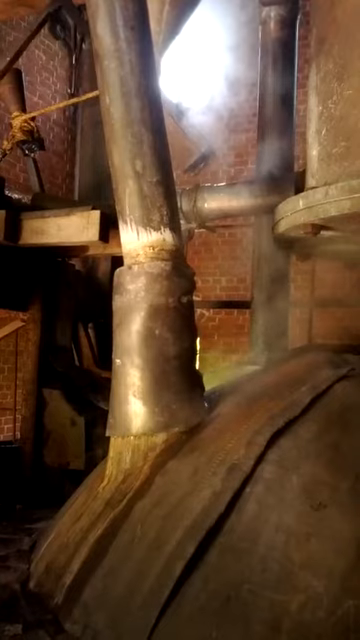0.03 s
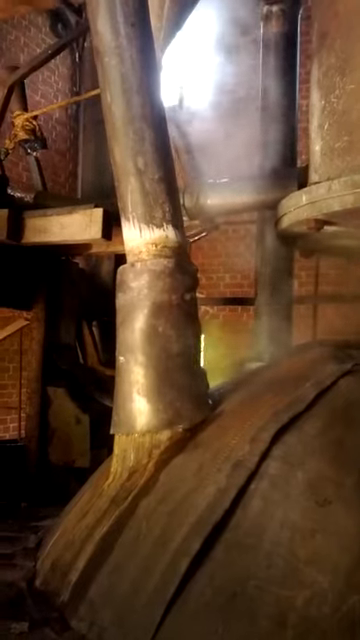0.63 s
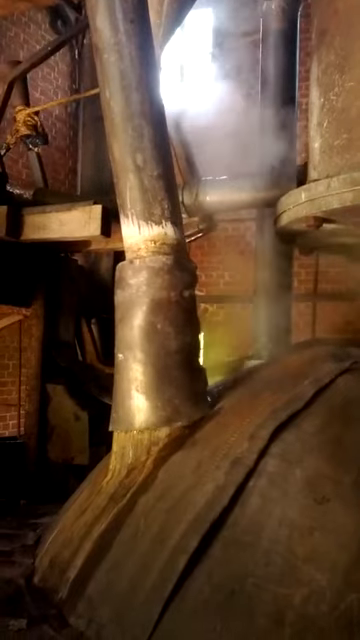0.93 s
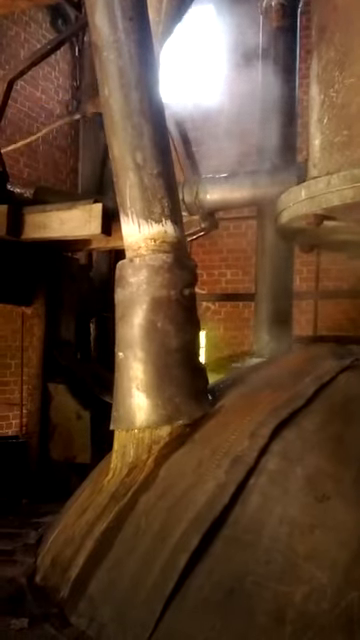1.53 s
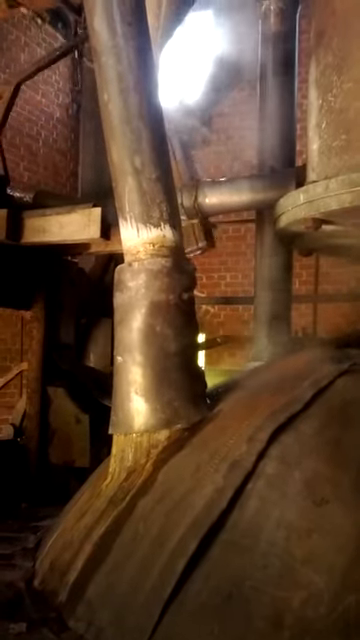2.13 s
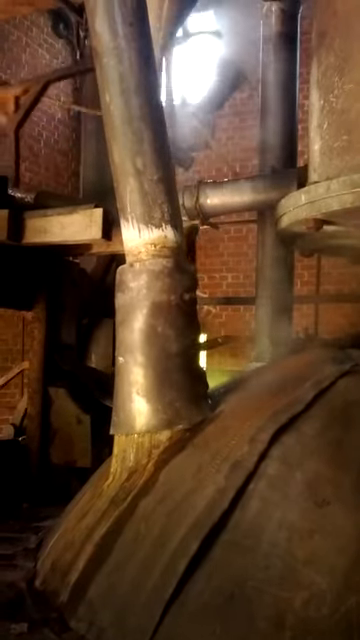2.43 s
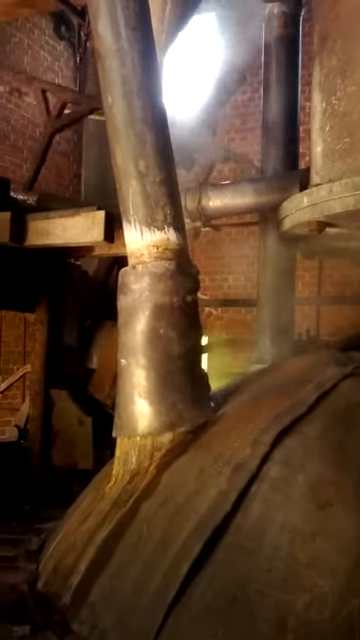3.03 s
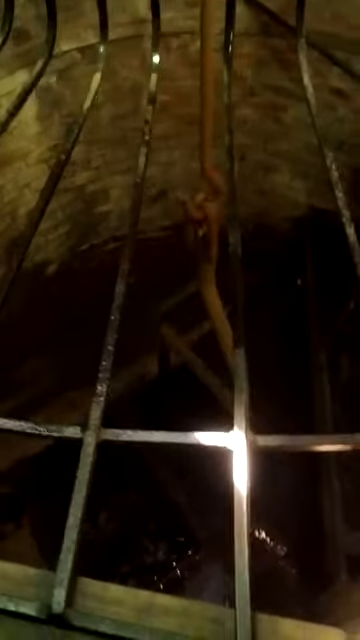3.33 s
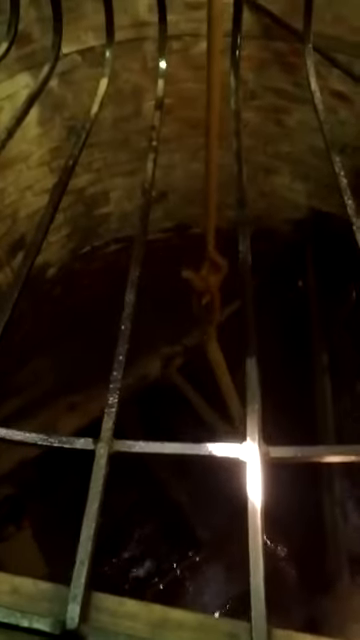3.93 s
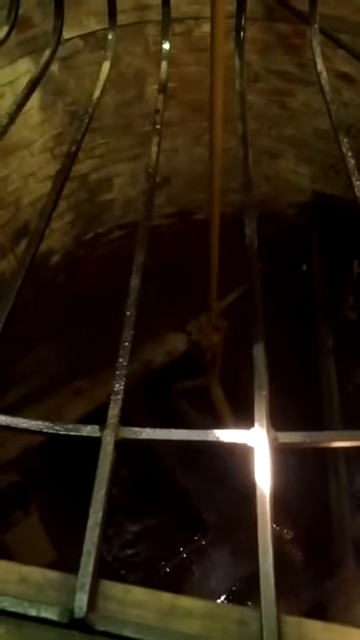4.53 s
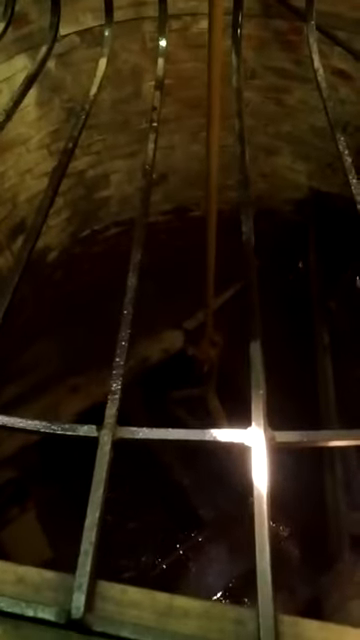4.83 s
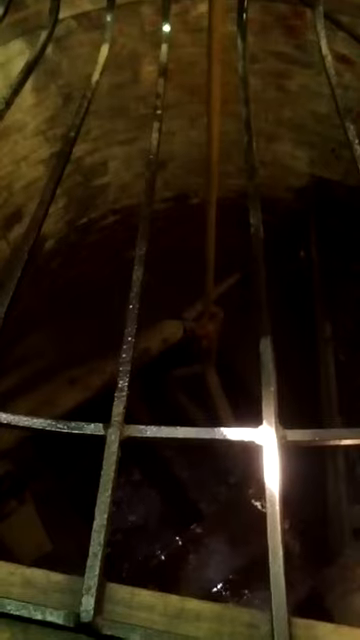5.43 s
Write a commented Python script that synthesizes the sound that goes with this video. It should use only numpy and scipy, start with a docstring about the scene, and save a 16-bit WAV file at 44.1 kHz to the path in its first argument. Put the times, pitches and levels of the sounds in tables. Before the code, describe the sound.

Uneven metal knocks and sharp ringing clanks come from the nearby ironwork of a steam engine, over a growing hiss, the hardest blows slightly distorted. Brief pivot squeaks slip between them and brick walls echo. An abrupt cut moves the microphone beneath the engine, where lighter clinks sound over hissing water and steam and a low pipe hum, followed by one heavy, booming double knock. The sound is nearly mono.

```python
"""Iron levers and catches clank over simmering steam, close beside the valve gear of an old beam engine.
Struck iron pings and rebounds, a few pivots squeak, and the brick engine house rings on after every blow.
After a short silence we listen from below: water and steam hiss, a pipe hums and the beam thuds.
The sound is nearly mono, and the loudest blows clip."""
import sys
import numpy as np
from scipy import signal
from scipy.fft import rfft, irfft, next_fast_len
from scipy.io import wavfile
from scipy.ndimage import uniform_filter1d

SR = 44100
rng = np.random.default_rng(int(sys.argv[2]) if len(sys.argv) > 2 else 0)


def dump(signal):
    """Clip the signal to [-1, 1] and save it as 16-bit WAV at the path in sys.argv[1]."""
    limited = np.clip(np.atleast_2d(signal).T, -1, 1)
    pcm = np.round(limited * 32767).astype(np.int16)
    wavfile.write(sys.argv[1], SR, pcm)


N = 250047
TIME = np.arange(N) / SR


def gear(start, end):
    """The engine's ironwork between two times [s]: its blows and its short falling tones."""
    # (time [s], part, level [dB], brightness [dB/octave], clear modes against the crash [dB])
    blows = [ (0.288, "lever", -4.5, 4.5, -15), (0.302, "lever", 0, 1, -1.5),
             (0.563, "lever", -4, 2.5, -18), (0.708, "lever", -15, -1, -13), (0.965, "chain", -25, 2, -9.5),
             (1.034, "link", -25, -1.5, -11), (1.099, "catch", -22, -0.5, -11),
             (1.324, "weight", -11.5, -2, -11), (1.356, "catch", -10.5, 0, -2),
             (1.377, "catch", -9, 2.5, -3.5), (1.651, "valve", -18.5, -1, -24),
             (1.703, "catch", -11, 1.5, -7), (1.842, "catch", -7, 1, -16), (1.868, "catch", -5, 1, -11),
             (1.920, "lever", -13, 1.5, -13), (1.965, "weight", -12, -1, -16), (1.991, "weight", 3, 0, -8),
             (2.143, "lever", -15, -.5, -22), (2.274, "catch", -15.5, 4, -6), (2.461, "link", -25, 2.5, -2),
             (2.602, "valve", -.5, 1, -0.5), (2.658, "piston", -6.5, 1.8, -7), (2.885, "rod", -5, 2.1, -8),
             (2.914, "rod", -8, 4.5, -9), (3.139, "valve", -16.5, 1, -22), (3.211, "rod", -15.5, 5, -10),
             (3.263, "rod", -15.5, 3.5, -16), (3.433, "link", -16.5, 0.5, -6),
             (3.636, "link", -25.5, 0, -5.5), (3.784, "link", -24, -.5, -15),
             (3.835, "link", -21.5, -0.5, -13), (4.862, "chain", -18.5, 0, -10),
             (4.882, "chain", -19.5, 0, -18), (5.109, "stop", -10, -1, 3), (5.139, "beam", -3.5, 0.1, -3), ]
    # chirps and pings of struck iron, a few pivot squeaks:
    # (time [s], length [s], first pitch [Hz], level [dB])
    chirps = [ (0.287, 0.018, 720, -15), (0.299, .033, 4120, -6), (1.322, 0.0095, 2260, -15.5),
              (1.332, .012, 950, -15), (1.823, 0.034, 9700, -19), (2.059, 0.021, 2020, -9.5),
              (2.642, 0.011, 1280, -4.5), (3.135, 0.026, 4700, -25), (3.209, .016, 1640, -27),
              (3.263, 0.018, 1780, -18), (3.280, 0.02, 1478, -20), (3.850, 0.033, 3550, -29),
              (4.810, 0.028, 3830, -34), ]
    track = np.zeros(N)
    for start_s, part, db, tilt_db, modes_db in blows:
        if start <= start_s < end:
            add(track, start_s, strike(part, db, tilt_db, modes_db))
    for start_s, length_s, hz, db in chirps:
        if start <= start_s < end:
            add(track, start_s, amp(db) * chirp(length_s, hz))
    return track


def strike(part, db, tilt_db, modes_db):
    """One blow on a part, crashing longer the heavier it is, and its rebounds."""
    # how each part makes contact: (crash t60 of a 0 dB blow [s], rise [s], step per rebound [dB])
    contact_of = { "lever": (0.28, 0.0017, -9.5), "catch": (0.23, 0.0015, -13.5),
                  "weight": (.26, 0.0013, -21), "valve": (0.31, 0.0013, -24), "rod": (.15, 0.00089, -22),
                  "link": (.66, 0.0023, -19), "chain": (0.98, 0.0048, -12), "piston": (0.45, 0.00088, -23),
                  "stop": (0.51, 0.0011, -20), "beam": (0.5, 0.0073, -15.5), }
    t60, rise_s, rebound_db = contact_of[part]
    crash_t60 = t60 * 2 ** (db / 24)  # twice as long for 24 dB more
    blow = iron_blow(part, tilt_db, crash_t60, rise_s, modes_db)
    return amp(db) * rebounds(blow, rebound_db)


def iron_blow(part, tilt_db, crash_t60, rise_s, modes_db, ring_scale=0.54, size=32768):
    """Iron meets iron: a crash of crowded modes dies away while a few clear ones ring."""
    # each part's crowded modes, as a spectrum: (frequency [Hz], relative density [dB])
    body_of = { "lever": [(29, -44), (50, -13), (118, -1), (284, -6), (521, 0), (1370, -10.5), (1650, -1.5),
               (2160, -6.5), (2640, -9.5), (3880, -7.5), (4440, -10), (6970, -13), (10900, -14.5),
               (14200, -71), (22000, -120)], "catch": [(29, -56.5), (50, -12), (118, 4.5), (332, -1.5),
               (398, 7.5), (455, -1), (668, -0.5), (5820, -5.5), (7290, -10), (7800, -8), (10000, -6.5),
               (10900, -5), (14200, -64), (22000, -120)], "weight": [(29, -46), (50, -20), (115, -17),
               (683, -14), (819, -9), (1260, -11.5), (1930, -9.5), (2210, -15), (2470, -7.5), (2640, -9),
               (3710, -9.5), (10900, -9.5), (14200, -47), (22000, -120)], "valve": [(59, -37), (100, 5),
               (331, -8.5), (659, 1), (2410, -10.5), (2930, -5), (4020, -8.5), (4350, -6.5), (5290, -7.5),
               (9530, -7), (10900, -9), (14200, -45), (22000, -120)], "rod": [(290, -44), (500, -36),
               (894, -9), (991, -10), (1170, -12.5), (1390, -6.5), (1790, -13), (1940, -10.5), (2510, -26),
               (3210, -27.5), (4910, -33.5), (8780, -22), (10900, -34.5), (14200, -60), (22000, -120)],
               "link": [(240, -38), (400, -9), (472, -11), (499, -18), (944, -15), (1130, -5), (1780, -13),
               (2080, -10), (4270, -7.5), (10900, -18), (14200, -56), (22000, -120)], "chain": [(88, -41),
               (150, -13), (221, -6), (261, -34), (300, -2), (548, -14.5), (782, 1.5), (899, -11),
               (1150, -9.5), (1910, -18), (2530, -26), (3610, -22), (6000, -49), (7800, -58),
               (13200, -120)], "piston": [(16, -43), (28, -18), (48, 6), (98, -0.5), (324, -7), (684, -1.5),
               (878, -10.5), (1770, -18), (2910, -25.5), (4240, -29), (6640, -27), (10900, -29),
               (14200, -54), (22000, -120)], "stop": [(29, -41), (50, -13), (340, -5.5), (466, -8.5),
               (715, -12), (1610, -17.5), (2700, -28), (3790, -24.5), (10900, -24), (14200, -59),
               (22000, -120)], "beam": [(20, -28), (42, -3), (62, -21), (95, 3), (140, -6.5), (215, 0),
               (300, -7), (520, -6.5), (670, -3.5), (950, -9.5), (1400, -10), (2000, -17.5), (4000, -19),
               (11000, -25.5)], }
    # each part's clear modes: (frequency [Hz], relative level [dB], t60 before ring_scale [s])
    modes_of = { "lever": [(518, -5.5, 0.23), (1630, -28, 0.62), (2080, -7, 0.92), (2369, -12, 0.64),
                (2600, -34, 0.58), (3040, 3, 0.14), (3880, -20, 0.48), (3881, -7, 0.38), (4000, -30, 1.2),
                (4420, -9, 0.49), (4753, -12, 0.29), (5660, -4.5, 0.16), (6417, -7, 0.2), (6200, -3, 0.23),
                (7100, -2, 0.42), (7550, -17, 0.58), (9000, -18, 0.43), (9400, -1, 0.27), (9469, -23, 0.42),
                (9900, -23, 0.42)], "catch": [(1960, -19, 0.54), (3550, -14, .5), (5450, -4, .3),
                (5720, -4, 0.52), (6400, -2, .25), (6681, -14, 0.37), (7720, 2, 0.28), (7870, 5, 0.37),
                (8650, -17, 0.33), (10100, -11, .2), (9800, -3, 0.12), (10830, 5.5, 0.15)],
                "weight": [(1906, -12, 0.45), (2440, -5, 0.46), (2750, -18, 0.5), (3780, -4, 0.5),
                (4180, -18, .6), (4667, -16, .25), (5840, -13, .4), (6928, -12, .35), (7280, -4, .3),
                (8800, -7, .3), (9850, 1, .18), (10400, -10, .25), (11440, 3, .24), (10900, 0, .3)],
                "valve": [(2930, -7, 0.49), (3740, -17, 0.71), (4450, -10, 0.44), (4484, 1, 0.32),
                (6380, -11, 0.3), (6460, -4, 0.4), (6630, 5.5, 0.19), (10200, -6, 0.34), (9240, 5.5, 0.12),
                (9550, 3, 0.15), (11500, -19, 0.59)], "rod": [(1027, -1, 0.6), (1400, 6.5, 0.23),
                (2000, -8, 0.53), (2420, -12, 0.83), (7052, -15, 0.37), (7585, -20, 0.44), (7800, 5, 0.065),
                (9000, -24, 1)], "link": [(1118, 0.5, 0.51), (2160, 3, .3), (2568, -13, 0.25),
                (3655, -8, 0.13), (4300, 5, 0.21), (6900, -12, 0.21), (7160, -14, .25)],
                "chain": [(334, -25, 0.42), (725, 3, 1), (810, -1, 3.2), (820, 4, 1), (1177, 17, 1.1),
                (1570, -2, 0.57), (1870, 11, 0.79)], "piston": [(98.2, 0.5, 0.81), (381, -5.5, 0.89),
                (466, -26, 0.91), (540, -10, .7), (693, -4, 0.89), (702, -2, 0.51), (771, 0, 0.48)],
                "stop": [(93.4, -4, 0.79), (207, -10, 0.44), (299, -0.5, 0.28), (344, 6.5, 0.21)],
                "beam": [(41.8, -4, 1), (91.4, -7, 0.7), (155, -8, 0.65), (213, -6, .45),
                (266.5, 5.5, 0.36), (294.4, 5.5, 0.21), (451, -13, 1), (693, -2.5, .8), (824, -8, 1),
                (1010, -13, 0.96), (1230, -5, 0.4), (1406, -11, 0.9)], }
    t = np.arange(size) / SR

    def hardness_db(hz):
        """A harder contact tilts the whole spectrum upwards."""
        return tilt_db * np.log2(np.maximum(hz, 200) / 1000)

    def crash_gain(hz):
        """A short, clean contact bunches the upper modes into brief partials; a long one smears them."""
        bunching_db = 4 * ripple(hz, spacing_hz=70) * np.minimum(hz / 1500, 1) * min(.15 / crash_t60, 1)
        return amp(at(body_of[part], hz) + hardness_db(hz) + bunching_db)

    crash = noise(size, crash_gain) * fade(t, crash_t60)
    mode_hz, mode_db, decays = np.transpose(modes_of[part])
    # each blow lands on a slightly different spot and stirs the clear modes in a new balance
    scatter_db = 1.5 * rng.standard_normal(len(mode_hz))
    gains = amp(mode_db + hardness_db(mode_hz) + scatter_db)
    gains /= np.sqrt(np.sum(gains ** 2) / 2)
    phases = rng.uniform(0, 2 * np.pi, len(mode_hz))
    ring = sum(gain * np.sin(2 * np.pi * hz * t + phase) * fade(t, ring_scale * decay)
               for hz, gain, decay, phase in zip(mode_hz, gains, decays, phases))
    chatter = amp(2 * walk(rate_hz=122)[:size])  # loose joints roughen the ring
    attack = 1 - np.exp(-t / rise_s)
    return (crash + amp(modes_db) * ring * chatter) * attack


def rebounds(sound, rebound_db, first_gap_s=.074, gap_shrink=.9, dull_hz=6000):
    """Loose iron lands and bounces three times, each sooner, weaker and duller than the last."""
    soften = signal.butter(1, dull_hz, fs=SR, output="sos")
    track = np.pad(sound, (0, SR // 2))
    start_s = 0
    for bounce in range(3):
        start_s += first_gap_s * gap_shrink ** bounce
        sound = amp(rebound_db) * signal.sosfilt(soften, sound)
        add(track, start_s, sound)
    return track


def chirp(length_s, first_hz, fall_hz_per_s=8100, waver_hz=75, overtone_db=-12):
    """A short, unsteady falling tone: a chirp or ping of struck iron, or a pivot's squeak."""
    size = int(length_s * SR)
    glide_hz = np.linspace(first_hz, first_hz - fall_hz_per_s * length_s, size)
    wobble = unit(uniform_filter1d(rng.standard_normal(SR), size=30))[:size]
    phase = 2 * np.pi * np.cumsum(glide_hz + waver_hz * wobble) / SR
    tone = sum(amp(overtone_db * k) * np.sin((k + 1) * phase)
               for k in range(3) if (k + 1) * first_hz < SR / 2)
    return unit(tone) * signal.windows.tukey(size, .6)


def simmer(valve_opens_s=1.47, swell_db_per_s=3.5, full_swell_db=5.5):
    """Steam close by at the valve gear: the valve is thrown open and the flow swells to full strength."""
    # simmering steam: (frequency [Hz], relative density [dB])
    spectrum = [(15, -34), (25, -3), (48, -3), (99, -1), (145, -4), (380, -8), (478, -0.5), (602, -7.5),
                (756, -2.5), (881, -6), (1030, -4), (2910, -19.5), (10900, -21.5), (14200, -76),
                (22000, -120)]
    swell_db = np.clip(swell_db_per_s * (TIME - valve_opens_s), 0, full_swell_db)
    return amp(-29.5 + swell_db) * steam(spectrum, flicker_db=2.5)


def spray():
    """Water and steam hiss steadily below the engine."""
    # escaping water and steam: (frequency [Hz], relative density [dB])
    spectrum = [(15, -41), (25, -9), (48, -15.5), (66, -10.5), (101, -14.5), (118, -12.5), (196, -12.5),
                (229, -16.5), (310, -10.5), (400, -14), (649, -12.5), (1110, -14), (2090, -17),
                (10900, -21), (14200, -127), (22000, -120)]
    return amp(-27.5) * steam(spectrum, flicker_db=0)


def steam(spectrum, flicker_db):
    """Escaping steam of rms 1: each band of the hiss flickers on its own by about flicker_db."""
    hiss = noise(next_fast_len(N), lambda hz: amp(at(spectrum, hz)))
    return unit(sum(band[:N] * amp(flicker_db * walk(rate_hz=18)) for _, band in split(hiss)))


def pipe_hum(pipe_hz=200, half_width_hz=7.3):
    """The flow keeps one pipe resonance humming unsteadily."""
    hum = noise(next_fast_len(N), lambda hz: 1 / (1 + ((hz - pipe_hz) / half_width_hz) ** 2))
    return amp(-37.5) * hum[:N]


def engine_house(sound, low_cut_hz, echo_db, build_s=0.011, size=65536):
    """Direct sound, thin below low_cut_hz, and a brick echo that builds up and holds the lows longest."""
    # the brick walls' echo: (frequency [Hz], relative energy [dB], t60 [s])
    walls = [(50, 4, 1.64), (198, 2.5, 1.03), (690, 0, 1.34), (2000, -1.5, 0.7), (4370, -4, 0.56),
             (10100, -12, 0.47)]
    t = np.arange(size) / SR
    tail = np.zeros(size)
    for hz, band in split(rng.standard_normal(size)):
        envelope = fade(t, at(walls, hz, column=2)) * (1 - np.exp(-t / build_s))
        tail += amp(at(walls, hz)) * band * envelope / np.linalg.norm(envelope)
    direct = signal.sosfilt(signal.butter(1, low_cut_hz, "high", fs=SR, output="sos"), sound)
    return direct + amp(echo_db) * signal.fftconvolve(sound, tail)[:N]


def stereo_width(mid, size=512):
    """Nearly mono sound, with slight stereo width in the treble."""
    # how far left and right differ: (frequency [Hz], side against mid [dB])
    side_levels = [(800, -72), (1300, -60), (1600, -45), (2500, -11.5), (4000, -32.5), (6000, -34),
                   (8000, -8), (11000, -30)]
    hz = np.fft.rfftfreq(size, 1 / SR)
    random_phase = np.exp(2j * np.pi * rng.random(len(hz)))
    side_filter = irfft(amp(at(side_levels, hz)) * random_phase) * signal.windows.tukey(size, .5)
    side = signal.fftconvolve(mid, side_filter)[:N]
    return np.array([mid + side, mid - side])


def amp(db):
    return 10 ** (np.asarray(db) / 20)


def unit(x):
    return x / np.sqrt(np.mean(x ** 2))


def fade(t, t60):
    return np.exp(-np.log(1000) * t / t60)


def at(points, hz, column=1):
    """Read a column of a table on a log-frequency axis."""
    table = np.array(points, float)
    return np.interp(np.log(np.maximum(hz, 1)), np.log(table[:, 0]), table[:, column])


def noise(size, gain):
    """Noise of rms 1 whose spectrum follows gain(Hz)."""
    white = rfft(rng.standard_normal(size))
    return unit(irfft(white * gain(np.fft.rfftfreq(size, 1 / SR)), size))


def split(x, count=14):
    """Overlapping bands that add up to x: (centre [Hz], band)."""
    centres = np.geomspace(35, 12000, count)
    hz, spectrum = np.fft.rfftfreq(len(x), 1 / SR), rfft(x)
    return [(centre, irfft(spectrum * at(np.c_[centres, weights], hz), len(x)))
            for centre, weights in zip(centres, np.eye(count))]


def walk(rate_hz):
    """Random levels, drawn rate_hz times a second and smoothed twice; rms 1."""
    hold = int(SR / rate_hz)
    steps = np.repeat(rng.standard_normal(N // hold + 1), hold)
    return unit(uniform_filter1d(uniform_filter1d(steps, hold), hold)[:N])


def ripple(hz, spacing_hz):
    """Random peaks and dips along the frequency axis; spread near 1."""
    knots = np.arange(0, SR / 2, spacing_hz)
    return np.interp(hz, knots, rng.standard_normal(len(knots)))


def add(track, start_s, sound):
    """Mix a sound into the track."""
    start = int(start_s * SR)
    track[start:start + len(sound)] += sound[:N - start]


def scene():
    """The microphone stands beside the valve gear, then below it, nearer to the heavy parts."""
    pause_start_s, pause_end_s, fade_s = 3.3245, 3.3655, .002  # silence between the two places
    beside = engine_house(gear(0, pause_start_s), low_cut_hz=196, echo_db=0) + simmer()
    below = engine_house(gear(pause_end_s, N / SR), low_cut_hz=30, echo_db=1.5) + spray() + pipe_hum()
    leaving = np.clip((pause_start_s - TIME) / fade_s, 0, 1)
    arriving = np.clip((TIME - pause_end_s) / fade_s, 0, 1)
    return stereo_width(beside * leaving + below * arriving)


def record(dry):
    """The loudest blows clip; the sound is low-passed, then clipped and low-passed again."""
    sound = dry
    for top_hz in (11100, 15800):
        low_pass = signal.ellip(10, .2, 80, top_hz, fs=SR, output="sos")
        sound = signal.sosfilt(low_pass, np.clip(sound, -1, 1))
    return sound


dry = scene()
out = record(dry)
dump(out)
```